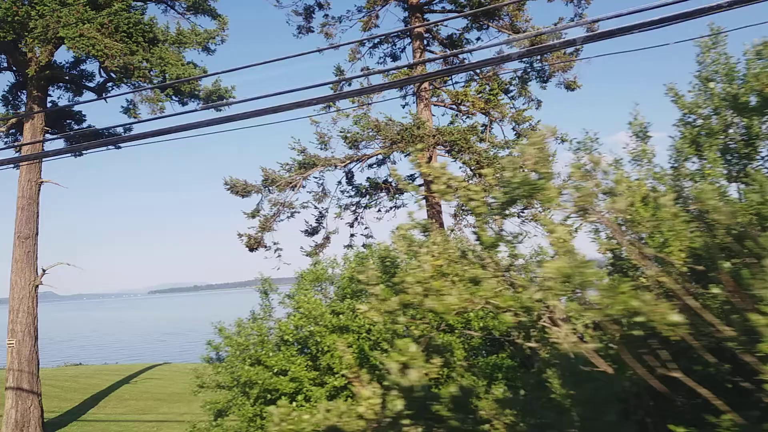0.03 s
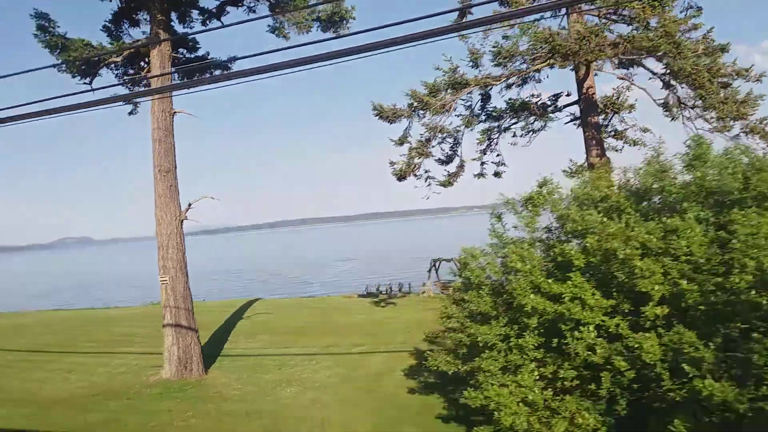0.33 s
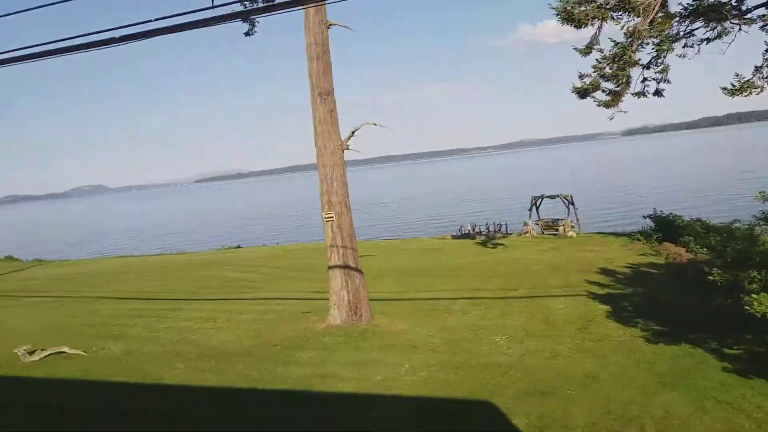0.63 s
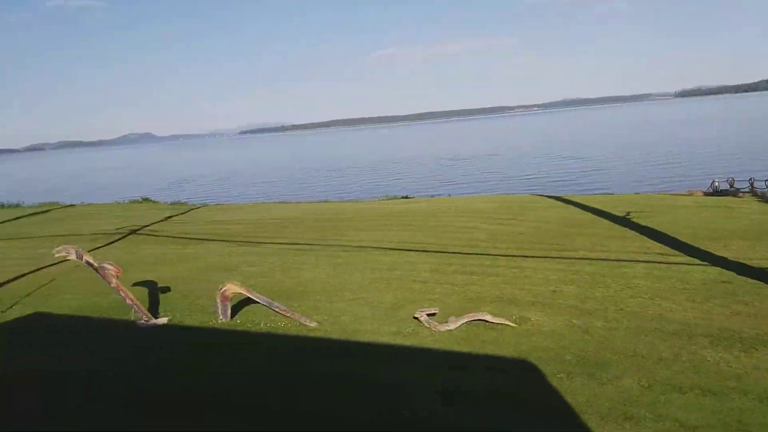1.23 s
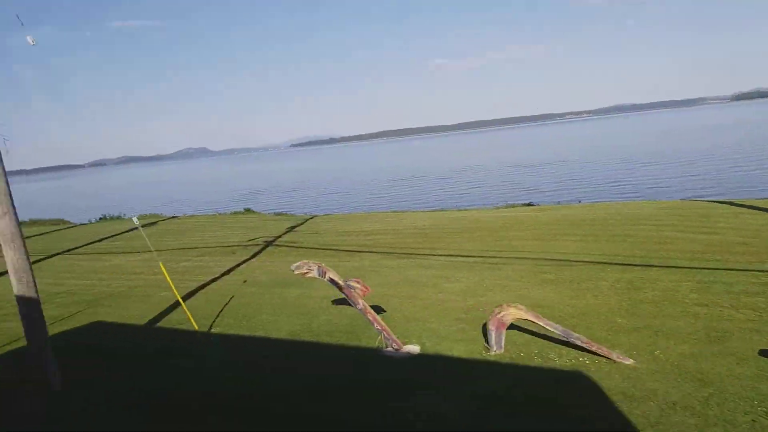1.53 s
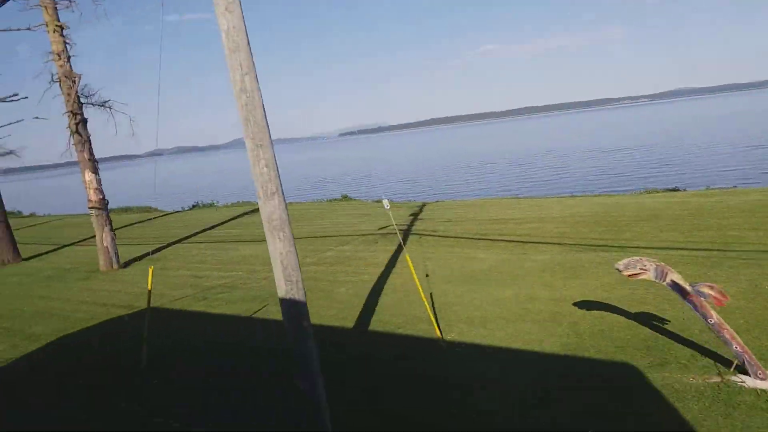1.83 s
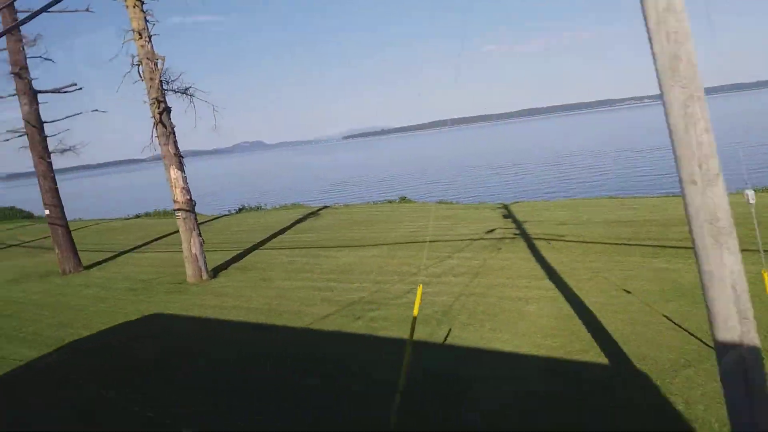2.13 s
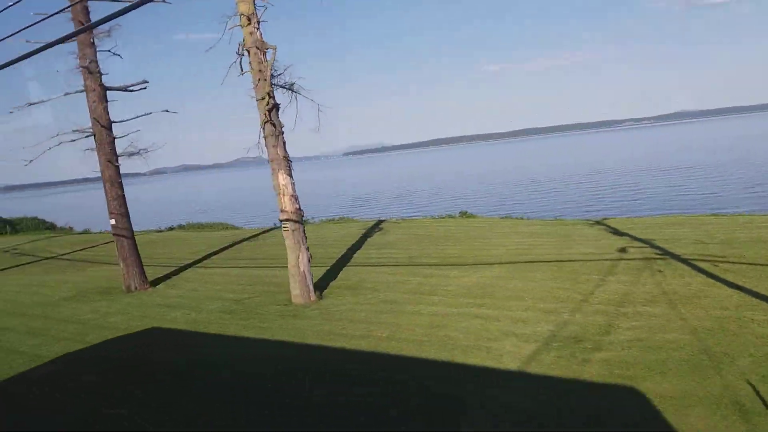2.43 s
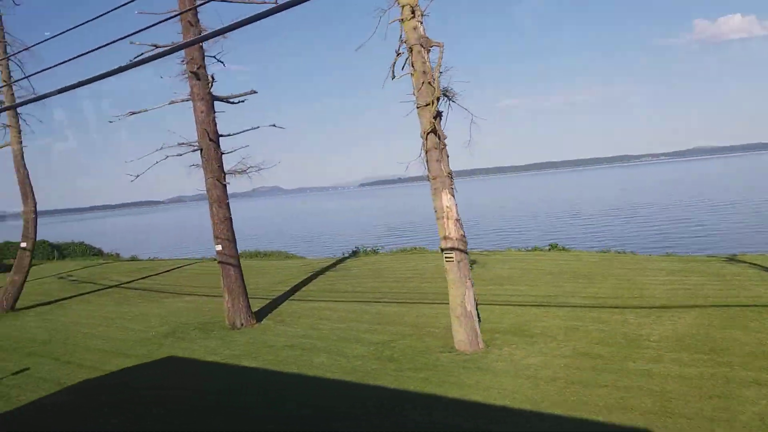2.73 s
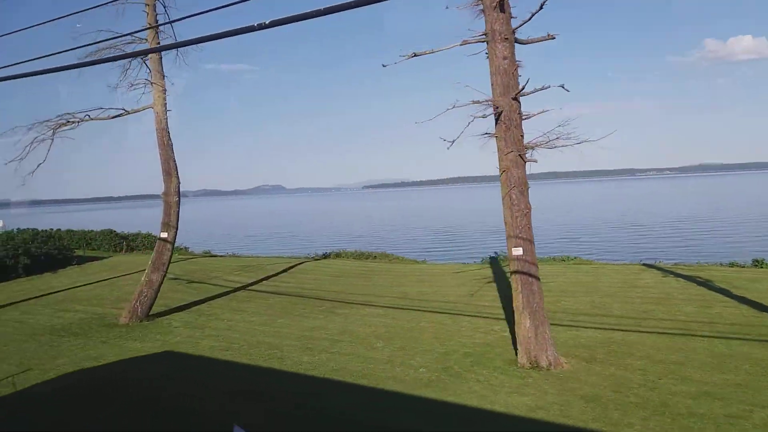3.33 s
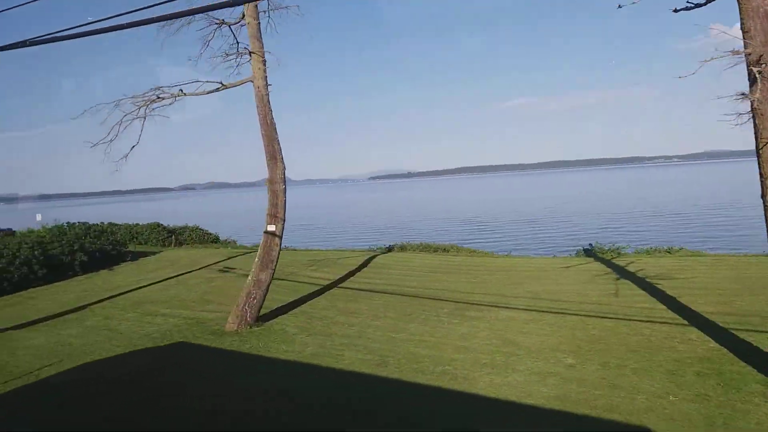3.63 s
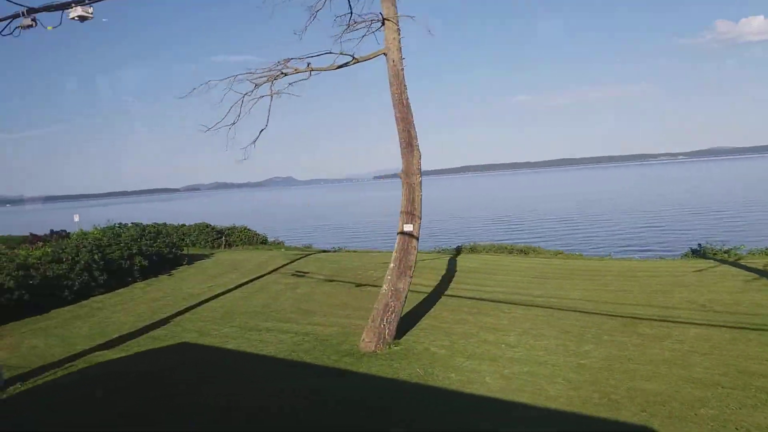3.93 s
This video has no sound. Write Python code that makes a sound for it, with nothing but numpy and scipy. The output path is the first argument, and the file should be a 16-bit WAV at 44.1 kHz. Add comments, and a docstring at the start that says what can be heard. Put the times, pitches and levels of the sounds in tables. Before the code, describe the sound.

Low road rumble fills the cabin of a bus driving at an even speed. Engine hum, air hiss and a thin whine run underneath, while a few soft thumps, one brief creak and faint rattles occur near the microphone inside.

```python
"""Bus cabin at a steady speed

From a window seat: road rumble booms all around, with a low engine drone, a faint gear whine
and air rushing along the windows. Bumps thump through the floor; loose trim ticks, chatters
and rustles, and a fitting creaks. One microphone, which opens just after the start;
its bass then settles in."""
import sys
import numpy as np
from scipy import signal
from scipy.fft import rfft, irfft
from scipy.io import wavfile

SR = 44100
rng = np.random.default_rng(int(sys.argv[2]) if len(sys.argv) > 2 else 0)


def log_audio(samples):
    """Write samples as a 16-bit WAV file to the path given in sys.argv[1]."""
    # one column per channel
    frames = np.atleast_2d(samples).T
    # limit to full scale, then quantise
    limited = np.clip(frames, -1, 1)
    pcm = np.round(limited * 32767).astype(np.int16)
    wavfile.write(sys.argv[1], SR, pcm)


N = 176400

# effort of the ride, which lifts road noise, air and the fainter tones: t/s, gain/dB
RIDE_EFFORT = [(.1, -5.5), (.2, -2.5), (.3, -1.5), (.75, 0.55), (1.2, 0.3), (1.7, 1), (1.85, -0.5),
               (2.05, 0.9), (2.35, 0.5), (2.8, 0.5), (3.1, 0), (3.7, -1), (4, 0.5)]


def road(rumble_db=-28.5, grain_db=0.5, grain_hz=25):
    """The tyres shake the body unevenly; the cabin booms at its resonances."""
    # road noise at the seat: f/Hz, relative level/dB
    spectrum = [(20, -44), (44, -28), (54, -7.5), (70, -2), (95, -5), (150, -1.5), (225, -2.5), (270, -7.5),
                (330, -9.5), (450, -12.5), (560, -12.5), (650, -20), (820, -19), (1100, -20), (1400, -24.5),
                (2000, -29), (3200, -37.5), (6000, -65)]
    # resonances of the cabin and its panels: f/Hz, width/Hz, level/dB
    modes = [(91.8, 4, -39.5), (120.8, 5.5, -38), (141.9, 4, -35), (171.6, 5.6, -42), (213.4, 4.1, -42.5),
             (227.9, 5.3, -45), (535.3, 8.2, -50.5), (815, 19, -49.5), (1125, 50, -55.5), (1524, 13, -59.5),
             (1910, 35, -61)]
    shaking = noise() * undb(grain_db * walk(grain_hz))
    rumble = undb(rumble_db) * colour(shaking, spectrum)
    boom = sum(undb(db) * ring(noise(), hz, width) for hz, width, db in modes)
    dull_boom = signal.sosfilt(signal.butter(2, 2500, fs=SR, output="sos"), boom)
    return (rumble + dull_boom) * undb(curve(RIDE_EFFORT))


def bumps(hz=124, width_hz=124, attack_s=0.0083, decay_s=0.021):
    """Uneven tarmac sends short dull thumps up through the floor."""
    # bumps in the road: t/s, level/dB
    jolts = [(.275, -29), (.38, -26.5), (0.729, -23), (1.39, -28), (1.42, -26.5), (1.61, -28), (1.65, -25),
             (2.105, -24.5), (2.31, -31), (3.545, -36)]
    thud = noise()
    for _ in range(3):
        thud = ring(thud, hz, width_hz)
    return thud * sum(undb(db) * burst(start, attack_s, decay_s) for start, db in jolts)


def engine(level_db=-36.5):
    """The engine drones at its firing rate, wavering in pitch and strength."""
    # firing rate: t/s, f/Hz
    firing = [(.1, 56), (2.6, 55.57), (3.3, 54), (4, 55.2)]
    return undb(level_db) * tone(curve(firing), wander=0.014, waver_db=3, wander_hz=4.8, waver_hz=14)


def whine(gear_hz=978.5):
    """A thin gear whine swells and sinks above fainter tones."""
    # main gear whine: t/s, level/dB
    swell = [(.1, -58), (.55, -46.5), (.9, -49), (1.25, -53), (1.7, -44), (1.9, -51.5), (2.15, -46),
             (2.7, -47.5), (3.25, -47), (3.55, -47.5), (4, -50)]
    # fainter tones of fans and gears: f/Hz, level/dB
    tones = [(745, -54), (1070, -54.5), (2271, -67), (2666, -68)]
    gear = undb(curve(swell)) * tone(gear_hz, wander=0.00202, waver_db=1.5)
    faint = sum(undb(db) * tone(hz, wander=0.003, waver_db=-1.0) for hz, db in tones)
    return gear + faint * undb(curve(RIDE_EFFORT))


def air(level_db=-50, follow=0.42, flutter_db=0.35):
    """Air hisses smoothly along the windows, partly following the effort of the ride."""
    # rushing air: f/Hz, relative level/dB
    spectrum = [(500, 1), (2500, -1.5), (3600, -1.5), (5400, 0.5), (6200, -3.5), (7100, -5), (8100, -16.5),
                (10000, -19.5), (11000, -23.5), (15500, -24.5)]
    hiss = colour(noise(), spectrum)
    return hiss * undb(level_db + follow * curve(RIDE_EFFORT) + flutter_db * walk(6.8))


def creak(rough_db=2.5, attack_s=0.0074):
    """A fitting creaks in quick slips, each ringing at its own pitch."""
    # slips of the fitting: t/s, f/Hz, width/Hz, level/dB, decay/s
    slips = [(1.012, 1400, 604, -34.5, 0.016), (1.019, 2260, 800, -39.5, 0.017),
             (1.036, 2940, 1200, -49, .018), (1.05, 675, 200, -35.5, 0.062)]
    friction = noise() * undb(rough_db * walk(250))
    return sum(undb(db) * ring(ring(friction, hz, width), hz, width) * burst(start, attack_s, decay)
               for start, hz, width, db, decay in slips)


def trim(rough_db=2.2, attack_s=0.0016, tick_decay_s=0.017, chatter_db=-51.5):
    """Loose fittings around the cabin tick, chatter and rustle in bursts of tiny contacts."""
    # ticks of loose trim: t/s, level/dB
    ticks = [(.636, -57), (.692, -59), (.798, -59), (.94, -59), (1.157, -59), (1.876, -61), (1.93, -66),
             (2.07, -65), (2.283, -59)]
    # soft rustles: t/s, length/s, level/dB
    rustles = [(.32, .15, -57), (.44, 0.12, -58), (0.524, .58, -65), (1.18, .15, -65), (1.55, .1, -61),
               (1.87, 0.29, -62), (2.08, .06, -63), (2.28, .06, -64), (3.5, .08, -67)]
    # spectra of a tick, a chattering panel and a rustle: f/Hz, relative level/dB
    tick_spectrum = [(3000, -20), (7000, -3), (10000, -2), (13500, 0), (15500, -4)]
    chatter_spectrum = [(2000, -9), (5000, -4), (7000, 4), (8500, -7), (12000, -12), (15500, -20)]
    rustle_spectrum = [(3000, -5), (7000, 1), (10000, -3), (12500, -7), (15500, -17)]
    ticking = sum(undb(db) * burst(start, attack_s, tick_decay_s) for start, db in ticks)
    chatter = undb(chatter_db) * burst(1.157, attack_s, decay_s=0.026)
    rustling = sum(undb(db) * np.sin(np.pi * np.clip((clock() - start) / length, 0, 1))
                   for start, length, db in rustles)
    layers = (ticking, tick_spectrum), (chatter, chatter_spectrum), (rustling, rustle_spectrum)
    return sum(envelope * colour(noise() * undb(rough_db * walk(300)), spectrum)
               for envelope, spectrum in layers)


def tone(hz, wander, waver_db, wander_hz=10.7, waver_hz=7.5):
    """A sine that wanders in pitch (by a fraction of hz) and wavers in strength, at rms 1."""
    pitch = hz * (1 + wander * walk(wander_hz))
    phase = 2 * np.pi * np.cumsum(pitch) / SR
    return unit(np.sin(phase) * undb(waver_db * walk(waver_hz)))


def burst(start, attack_s, decay_s):
    """A linear rise and an exponential fall."""
    age = clock() - start
    return np.clip(age / attack_s, 0, 1) * np.exp(-np.maximum(age - attack_s, 0) / decay_s)


def ring(x, hz, width):
    """One resonance driven by x, at rms 1."""
    f = bins()
    return unit(irfft(rfft(x) / (1 + 1j * (f * f - hz * hz) / (f * width)), N))


def colour(x, spectrum):
    """Filter x by rows of f/Hz, level/dB, at rms 1."""
    hz, db = np.array(spectrum).T
    gain = undb(np.interp(np.log(bins()), np.log(hz), db))
    return unit(irfft(rfft(x) * gain, N))


def walk(rate_hz):
    """Smooth random drift up to about rate_hz, at rms 1."""
    lowpass = np.exp(-np.minimum((bins() / rate_hz) ** 2, 20))
    return unit(irfft(rfft(noise()) * lowpass, N))


def noise():
    """White noise."""
    return rng.standard_normal(N)


def curve(rows):
    """Straight lines through rows of t/s, value."""
    return np.interp(clock(), *np.array(rows).T)


def clock():
    """Time of each sample."""
    return np.arange(N) / SR


def bins():
    """Frequency of each spectral bin, at least 1 Hz."""
    return np.maximum(np.arange(N // 2 + 1) * SR / N, 1)


def undb(db):
    """Decibels to gain."""
    return 10 ** (np.asarray(db) / 20)


def unit(x):
    """Scale to rms 1."""
    return x / np.sqrt(np.mean(x ** 2))


def scene():
    """The cabin from a window seat, in mono."""
    return (road() + air() + engine() + whine() + trim() + creak() + bumps())[None]


def record(dry, open_s=0.1048, bass_hz=106, settle_s=0.28, top_hz=15700):
    """The microphone opens abruptly, its bass fades in, and the top is cut."""
    age = clock() - open_s
    thin = signal.sosfiltfilt(signal.butter(3, bass_hz, "high", fs=SR, output="sos"), dry)
    bass = (dry - thin) * np.clip(age / settle_s, 0, 1) ** 2
    heard = (thin + bass) * (age >= 0)
    return signal.sosfilt(signal.ellip(10, .1, 80, top_hz, fs=SR, output="sos"), heard)


dry = scene()
out = record(dry)
log_audio(out)
```